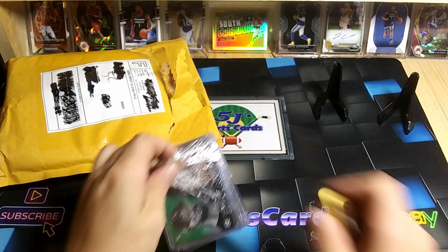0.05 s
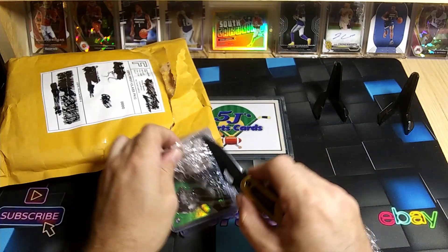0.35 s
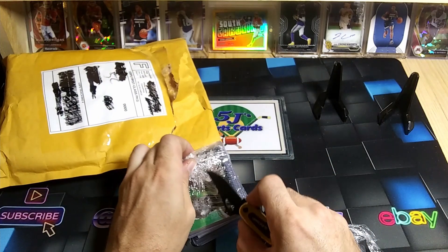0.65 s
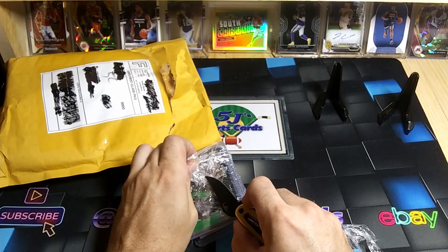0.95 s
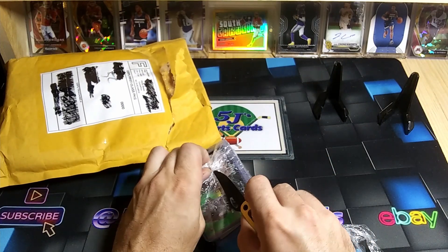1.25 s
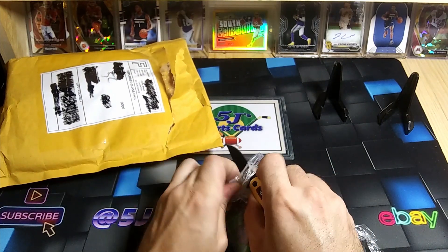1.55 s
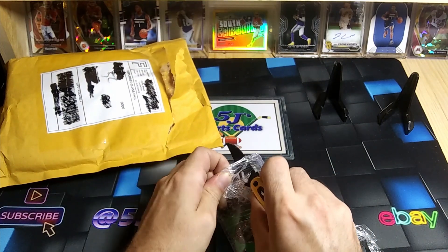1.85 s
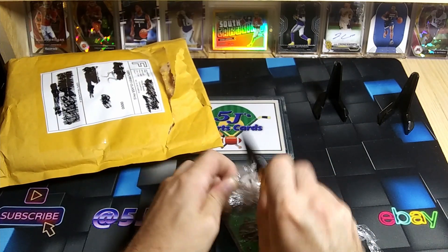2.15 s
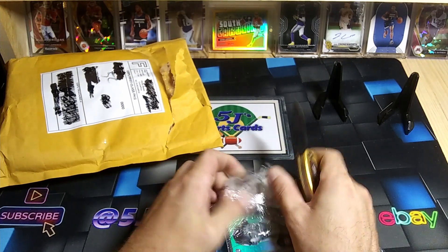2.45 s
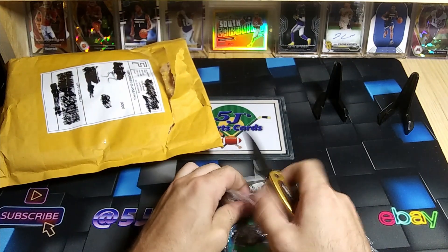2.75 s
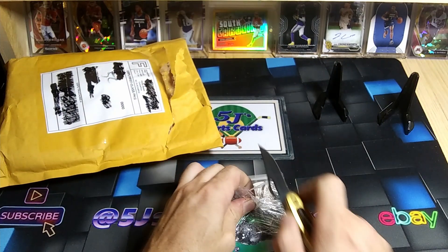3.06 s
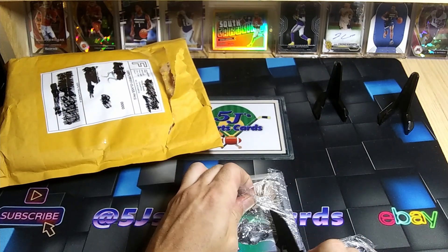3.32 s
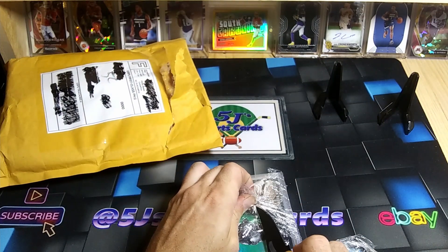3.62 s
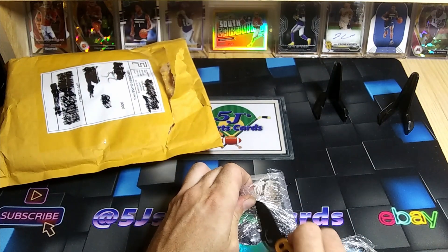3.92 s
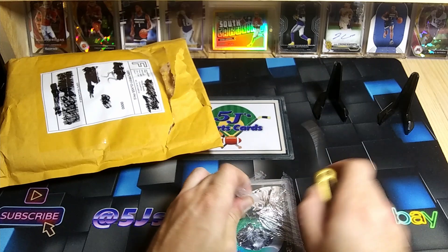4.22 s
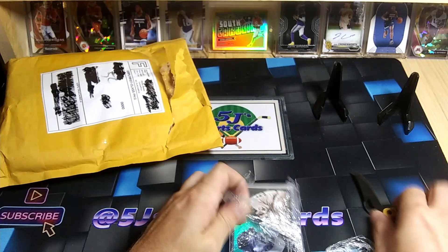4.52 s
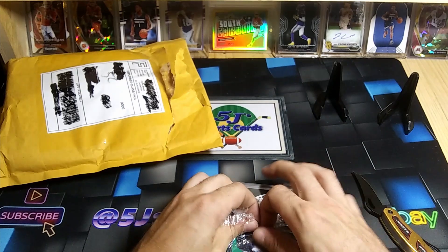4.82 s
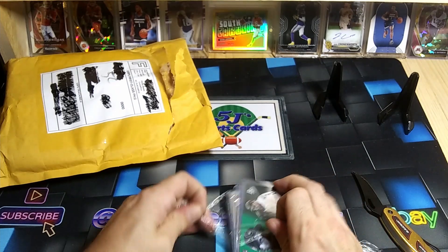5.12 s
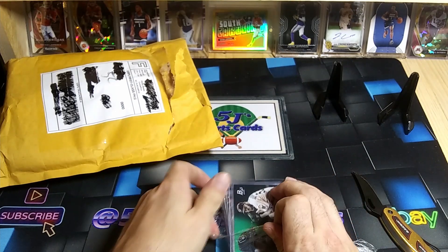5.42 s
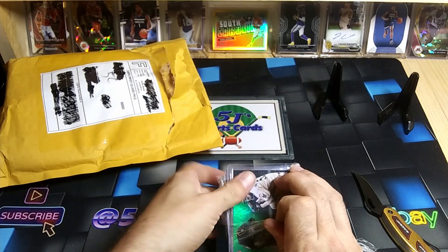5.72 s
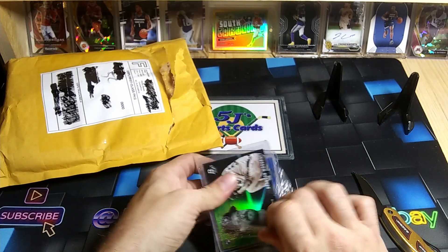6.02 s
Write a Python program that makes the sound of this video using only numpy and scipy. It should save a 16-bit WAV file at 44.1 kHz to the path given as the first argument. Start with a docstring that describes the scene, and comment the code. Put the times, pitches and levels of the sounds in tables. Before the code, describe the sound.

Close, crisp crackling of plastic wrap being cut and pulled off cards, with light knocks and finger rubbing over a soft whir.

```python
"""Clear plastic wrap is slit with a knife and peeled off a stack of cards, close to the microphone.
Each tug or cut is a burst of fine crinkle and ticks; large creases buckle in sharp snaps that ring briefly.
Fingers rub, the knife is laid down and the stack knocks, all just above a desk mat.
The place is a small room, heard in mono, with a soft steady whir farther back."""
import sys
import numpy as np
from scipy import signal
from scipy.io import wavfile
from scipy.ndimage import uniform_filter1d

SR = 44100
rng = np.random.default_rng(int(sys.argv[2]) if len(sys.argv) > 2 else 0)


def dump_mix(stems):
    """Bounce the given channels to the path in sys.argv[1] as a 16-bit WAV at rate SR."""
    frames = np.atleast_2d(stems).T  # one column per channel
    limited = np.clip(frames, -1, 1)  # hard clip at full scale
    pcm = np.round(limited * 32767).astype(np.int16)
    wavfile.write(sys.argv[1], SR, pcm)


N = 276844
TIME = np.arange(N) / SR
BAND_LIMIT_HZ = 16150

# tugs and cuts at the film: start_s, length_s, crinkle_db, rubbing_db
TUGS = [(0.0, 0.046, -58, -55), (0.838, 0.016, -56.5, -61), (0.975, 0.053, -50.5, -52),
        (1.06, 0.17, -45.5, -59), (1.42, 0.13, -33.5, -41), (1.638, 0.016, -52, -55),
        (1.734, 0.025, -47.5, -60), (1.797, 0.053, -40.5, -55), (1.946, 0.023, -46.5, -59),
        (2.018, 0.018, -37, -51), (2.107, 0.045, -35, -51), (2.168, 0.0088, -34, -35.5),
        (2.219, 0.085, -45.5, -50.5), (2.432, 0.012, -48.5, -51), (2.686, 0.028, -47, -58),
        (2.78, 0.042, -43, -48.5), (2.869, 0.06, -47, -51), (3.059, 0.026, -55, -43),
        (3.923, 0.012, -48, -60), (3.964, 0.1, -39, -48), (4.086, 0.048, -42, -42),
        (4.248, 0.015, -44.5, -44), (4.336, 0.06, -49.5, -64), (4.49, 0.075, -49.5, -59),
        (4.777, 0.054, -47, -51), (4.931, 0.034, -38.5, -54), (4.999, 0.067, -33, -53),
        (5.083, 0.15, -39.5, -44.5), (5.3, 0.035, -38, -48), (5.406, 0.01, -43, -46),
        (5.501, 0.009, -44, -48), (5.58, 0.034, -42, -46.5), (5.63, 0.024, -36.5, -35),
        (5.758, 0.033, -45, -52), (5.983, 0.11, -36.5, -48.5), (6.23, 0.01, -43.5, -44.5)]
# resonances of the wrapped stack: centre_hz, width_hz, height_db
STACK_MODES = [(895, 260, 3), (1623, 12.6, 7.5), (2700, 680, 7), (4110, 530, 7.5), (4440, 330, 6.5),
               (7800, 790, -2.5)]


def amp(db):
    """Decibels to gain."""
    return 10 ** (np.asarray(db) / 20)


def unit_rms(x):
    """Scales to rms 1."""
    return x / np.sqrt(np.mean(x ** 2) + 1e-20)


def curve_at(points, hz):
    """Reads a table on a log-frequency axis."""
    points_hz, values = np.transpose(points)
    return np.interp(np.log(hz + 1), np.log(points_hz + 1), values)


def add(mix, start_s, sound):
    """Mixes a sound in at start_s."""
    part = mix[max(round(start_s * SR), 0):][:len(sound)]
    part += sound[:len(part)]


def response(colour, peaks=(), size=4096):
    """Causal impulse response of a broad colour with resonances on top."""
    hz = abs(np.fft.fftfreq(size, 1 / SR))
    peaks_db = sum(height / (1 + (2 * (hz - centre) / width) ** 2) for centre, width, height in peaks)
    log_gain = np.log(amp(curve_at(colour, hz) + peaks_db))
    minimum_phase = np.exp(np.conj(signal.hilbert(log_gain)))
    return np.fft.ifft(minimum_phase).real[:size // 2]


def through(x, taps):
    """Convolves and keeps the length."""
    return signal.oaconvolve(x, taps)[:len(x)]


def resonate(x, hz, q):
    """One damped resonance, as a band-pass."""
    w = 2 * np.pi * min(hz, SR / 3) / SR
    a = np.sin(w) / (2 * q)
    return signal.lfilter([a, 0, -a], [1 + a, -2 * np.cos(w), 1 - a], x)


def whir(level_db=-57.5):
    """Steady air noise at the back of the room."""
    # broad spectrum of the air noise: frequency_hz, gain_db
    colour = [(30, -45), (90, -24), (170, -18), (260, -9), (350, 0.5), (560, 0.5), (800, -4.5),
              (1200, -4.5), (1500, -1), (1900, -18), (3000, -12.5), (5000, -14.5), (9000, -20),
              (16000, -26.5)]
    # its resonances: centre_hz, width_hz, height_db
    peaks = [(630, 30, 4), (1480, 90, 5), (3030, 60, 2), (3850, 300, 2)]
    return amp(level_db) * unit_rms(through(rng.standard_normal(N), response(colour, peaks)))


def room(x, gap_s=.006):
    """Sparse reflections of a small room, the bass lasting longest."""
    # decay of the room: frequency_hz, t60_s
    decay = [(200, 0.62), (1500, 0.21), (5000, 0.16), (15000, 0.32)]
    t = np.arange(SR // 2) / SR
    taps = rng.standard_normal(len(t)) * (rng.random(len(t)) < .08) * (t > gap_s)
    hz, frame_s, spectrum = signal.stft(taps, SR, nperseg=256)
    fade = amp(-60 * frame_s / curve_at(decay, hz)[:, None])
    tail = signal.istft(spectrum * fade, SR, nperseg=256)[1]
    return through(x, tail / np.linalg.norm(tail))


def desk(x):
    """The direct sound at the microphone with its first reflections."""
    # bounces off the desk and a row of card cases: delay_s, gain
    echoes = [(0.0019, 0.1), (0.00348, -0.13), (0.0055, 0.1)]
    return x + sum(gain * np.interp(TIME - delay_s, TIME, x, left=0) for delay_s, gain in echoes)


def effort(tug_db, fall_db_per_s, grip_db, rise_s=0.0096):
    """Level in dB of the hands' work: every tug rises, holds and dies away above the steady grip."""
    power = amp(grip_db) ** 2
    for (start_s, length_s, *_), db in zip(TUGS, tug_db):
        rise = np.clip((TIME - start_s) / rise_s, 0, 1)
        released_s = np.clip(TIME - start_s - length_s, 0, 1)
        power = power + (rise * amp(db - fall_db_per_s * released_s)) ** 2
    return 10 * np.log10(power)


def rubbing(trim_db=-2.0, catches_per_s=260, catch_db=17):
    """Skin and cards slide over the stack, never quite still: a dull rustle with small catches."""
    # spectrum of the friction: frequency_hz, gain_db
    colour = [(40, -26), (100, -22.5), (200, -17), (350, -6), (800, 0.5), (1300, 0.5), (2000, 0),
              (4000, -15), (16000, -28)]
    rub_db = effort([db for _, _, _, db in TUGS], fall_db_per_s=236, grip_db=-60.5)
    slide = rng.standard_normal(N)
    catches = rng.random(N) < catches_per_s / SR
    rustle = through(slide * (1 + amp(catch_db) * catches), response(colour, STACK_MODES))
    return unit_rms(rustle) * amp(rub_db + trim_db)


def drags(slips_per_s=700, q=9, trim_db=-1):
    """Something drags and rasps: a quick, uneven run of slips keeps one resonance ringing."""
    # rasping strokes: start_s, end_s, level_db, pitch_hz
    strokes = [(-.06, 0.14, -52, 1236), (3.988, 4.064, -34, 3900), (4.917, 5.055, -30.5, 4500)]
    out = np.zeros(N)
    for start_s, end_s, db, hz in strokes:
        slips = rng.standard_normal(N) * (rng.random(N) < slips_per_s / SR)
        swell = np.sin(np.pi * np.clip((TIME - start_s) / (end_s - start_s), 0, 1))
        rasp = resonate(resonate(slips, hz, q), hz, q)
        out += amp(db + trim_db) * swell * unit_rms(rasp)
    return out


def knocks(rattle_gain=0.67, rise_s=0.000087, q=1.26):
    """Soft blows: a damped tone with a rattle around it; small things radiate little bass."""
    # blunt contacts of knife, hands and stack: start_s, level_db, pitch_hz, t60_s
    contacts = [(0.9676, -29, 980, 0.039), (2.0243, -28, 1450, 0.054), (2.282, -27, 930, 0.018),
                (2.419, -41, 774, 0.037), (3.076, -39.5, 1210, 0.035), (3.707, -59, 204, 0.042),
                (4.134, -37.5, 390, 0.029), (4.521, -32, 363, 0.024), (4.523, -44, 224, 0.18),
                (4.565, -36, 1020, 0.025), (4.585, -30.5, 990, 0.017), (4.667, -55, 160, 0.11),
                (4.775, -19.5, 706, 0.015), (4.7757, -21.5, 1024, 0.016), (4.779, -47, 271, 0.2),
                (5.1039, -17, 1030, 0.016), (5.156, -32.5, 787, 0.065)]
    out, t = np.zeros(N), np.arange(SR // 4) / SR
    for start_s, db, hz, t60_s in contacts:
        rattle = unit_rms(resonate(rng.standard_normal(len(t)), hz, q=1.0))
        body = np.sin(2 * np.pi * hz * t) + rattle_gain * rattle
        envelope = amp(db - 60 * t / t60_s) * (1 - np.exp(-t / rise_s))
        add(out, start_s, resonate(body * envelope, hz, q))
    return out


def pull():
    """How hard the film is worked at each moment, in dB."""
    # the film stirs faintly between tugs, quietest at the start and at 3.2-3.8 s: time_s, crinkle_db
    grip = [(0.0, -67), (0.93, -60.5), (1.05, -54.5), (2.25, -53), (2.95, -52.5), (3.22, -63), (3.8, -60.5),
            (4.3, -52.5), (4.7, -53), (4.95, -44), (5.5, -52), (6.28, -52)]
    grip_db = np.interp(TIME, *np.transpose(grip))
    return effort([db for _, _, db, _ in TUGS], fall_db_per_s=245, grip_db=grip_db)


def snap(hz, ring_db, crack_taps, ring_taps, q=2.9, size=2048,
         jerk_s=0.00037, rise_s=0.00051, fast_t60_s=0.025, slow_t60_s=0.098):
    """A facet of film flips in a short crack; waves then scatter through film and stack."""
    t = np.arange(size) / SR
    # the fold runs along the crease in a few uneven jerks, so no two cracks have the same colour
    jerks = (t == 0) + 0.37 * rng.standard_normal(size) * np.exp(-t / jerk_s)
    push = through(jerks, crack_taps)
    # a higher bending mode of the facet gives the crack its edge
    crack = resonate(push, hz, q) + 0.24 * resonate(push, hz * 1.66, q)
    crack = crack / abs(signal.hilbert(crack)).max()
    rise = 1 - np.exp(-(t / rise_s) ** 2)
    fade = amp(-60 * t / fast_t60_s) + amp(-16 - 60 * t / slow_t60_s)
    scatter = resonate(through(rng.standard_normal(size) * rise * fade, ring_taps), hz, q=0.89)
    # the taut film around each crease sings on briefly in a few modes of its own
    modes_hz = [hz * 2 ** (0.55 * (step + rng.uniform(-0.478, 0.452))) for step in (-2, -1, 0.21, 0.86)]
    ring = scatter + 2.42 * sum(resonate(scatter, mode_hz, q=30) for mode_hz in modes_hz)
    ring *= np.linalg.norm(crack) / np.linalg.norm(ring)
    return rng.choice([-1, 1]) * crack + amp(ring_db) * ring


def crinkle(crack_taps, ring_taps, base_per_s=1000, spread_db=5, cap_db=17,
            pitch_hz=3800, trim_db=0.5, facets=40):
    """Swarms of tiny creases of many sizes, thicker as the film is pulled harder."""
    pull_db = pull()
    per_s = base_per_s * amp(.7 * (pull_db + 43))
    sizes = amp(np.minimum(spread_db * rng.exponential(1, N), cap_db))
    clicks = sizes * (rng.random(N) < per_s / SR)
    # the pull sets how much energy the creases share out from moment to moment
    power = uniform_filter1d(uniform_filter1d(clicks ** 2, size=900), size=900)
    clicks = clicks / np.sqrt(abs(power) + per_s / SR) * amp(pull_db + trim_db)
    # half of the clicks come from one facet, worked over and over for a moment
    busy_facet = rng.integers(0, facets, N)[np.arange(N) // (SR // 20)]
    click_facet = np.where(rng.random(N) < .5, busy_facet, rng.integers(0, facets, N))
    out = np.zeros(N)
    for facet, place in enumerate(np.linspace(-1, 1, facets)):
        hz = pitch_hz * 2 ** (0.38 * (place + place ** 3))
        grain = snap(hz, 0, crack_taps, ring_taps, q=3.0)
        out += through(clicks * (click_facet == facet), grain / np.linalg.norm(grain))
    return out


def ticks(crack_taps, ring_taps, per_s=32, above_db=13, spread_db=4.0, cap_db=-20,
          pitch_hz=4000, spread_octaves=0.4, ring_db=-6, top_hz=9000, count=400):
    """Middling creases let go at random: dry ticks, each at its own pitch, above the crinkle."""
    pull_db = pull()
    out = np.zeros(N)
    starts_s = np.cumsum(rng.exponential(1 / per_s, count))
    for start_s, (strength, detune) in zip(starts_s[starts_s < TIME[-1]], rng.standard_normal((count, 2))):
        db = min(pull_db[int(start_s * SR)] + above_db + spread_db * strength, cap_db)
        hz = pitch_hz * 2 ** (spread_octaves * detune)
        add(out, start_s, amp(db) * snap(hz, ring_db, crack_taps, ring_taps))
    return signal.lfilter(*signal.butter(2, top_hz, fs=SR), out)


def creases(crack_taps, ring_taps, dullest_hz=7000):
    """Large creases snap; the larger the facet, the slower it flips and the less treble it has."""
    # one large crease buckling per row: start_s, level_db, pitch_hz
    buckles = [(0.5214, -37.5, 3430), (0.574, -44, 3500), (0.967, -12, 3310), (1.0165, -31.5, 3840),
               (1.1201, -23.5, 3900), (1.176, -16.5, 7000), (1.198, -20, 3680), (1.291, -30, 5600),
               (1.4325, -41, 3340), (1.442, -10.5, 2660), (1.4668, -14, 4400), (1.502, -20, 3600),
               (1.54, -24, 3140), (1.554, -13, 2330), (1.7826, -18, 3600), (1.8248, -22, 2950),
               (1.8396, -9.5, 2690), (1.9, -29, 2820), (2.0082, -13.5, 3230), (2.0272, -10, 2890),
               (2.052, -11.5, 2570), (2.0984, -20, 4260), (2.1133, -11, 4400), (2.156, -31, 3640),
               (2.1783, -8.5, 2080), (2.684, -30, 3670), (2.7921, -18, 3930), (2.821, -21, 3850),
               (3.312, -41, 3300), (3.8364, -29.5, 4500), (3.9682, -6.5, 3000), (3.98, -23, 3600),
               (3.989, -7.5, 4180), (3.992, -9.5, 3840), (4.0058, -14.5, 4200), (4.0156, -14, 4120),
               (4.018, -14.5, 3630), (4.0237, -21, 3900), (4.0382, -10.5, 3550), (4.0499, -9, 3770),
               (4.1326, -5, 2630), (4.1374, -7.5, 2700), (4.32, -19, 4190), (4.3648, -24, 4320),
               (4.3993, -27, 3330), (4.5856, -25, 2540), (4.7749, -22, 3260), (4.923, -25.5, 4200),
               (4.9797, -12.5, 4300), (4.9877, -10, 3630), (4.9937, -9, 4200), (5.0149, -6, 4270),
               (5.0595, -17.5, 3750), (5.103, -1, 2700), (5.141, -21, 3840), (5.161, -15, 3260),
               (5.226, -15, 3660), (5.5987, -21, 3400), (5.6372, -8, 3400), (5.9782, -23, 5000),
               (6.024, -14.5, 3500), (6.2387, -18, 4100), (6.2445, -19, 3600)]
    out = np.zeros(N)
    for start_s, db, hz in buckles:
        ring_db = -6 - 0.28 * db  # the harder the snap, the more of it is in the first crack
        top_hz = min(dullest_hz * amp(-0.31 * db), BAND_LIMIT_HZ)
        sound = signal.lfilter(*signal.butter(2, top_hz, fs=SR), snap(hz, ring_db, crack_taps, ring_taps))
        add(out, start_s - .0002, amp(db) * sound)
    return out


def loosened(film, free_s=5.96, above_hz=7500, sizzle_gain=0.39):
    """Once the film hangs free of the stack, its finest creases sizzle more brightly."""
    treble = signal.filtfilt(*signal.butter(2, above_hz, "high", fs=SR), film)
    return film + sizzle_gain * treble * (TIME > free_s)


def scene(room_db=-15, film_above_hz=290, handling_above_hz=125):
    """Wrap and hands close to the microphone, the room around them."""
    # spectrum of a crease's first crack: frequency_hz, gain_db
    crack_colour = [(100, -31), (400, 0), (1000, 0), (2000, -1.5), (2800, 1.5), (4300, 1), (6000, -6),
                    (8500, -11.5), (11000, -6), (16000, -1)]
    # spectrum of the waves scattering after it: frequency_hz, gain_db
    ring_colour = [(100, -38), (250, 9.5), (600, -0.5), (1200, 6), (2000, -7.5), (3000, -7.5), (4400, -9.5),
                   (6000, -4.5), (9000, -1.5), (12000, -8.5), (16000, -25.5)]
    taps = response(crack_colour), response(ring_colour, STACK_MODES)
    film = loosened(creases(*taps) + ticks(*taps) + crinkle(*taps))
    # so light a sheet radiates almost no bass
    film = signal.lfilter(*signal.butter(2, film_above_hz, "high", fs=SR), film)
    handling = rubbing() + drags() + knocks()
    handling = signal.lfilter(*signal.butter(2, handling_above_hz, "high", fs=SR), handling)
    near = desk(film + handling)
    return (near + amp(room_db) * room(near) + whir())[None]


def record(dry):
    """The recorder's band limit."""
    taps = signal.firwin(511, BAND_LIMIT_HZ, window=("kaiser", 9), fs=SR)
    return signal.oaconvolve(dry, taps[None], "same")


dry = scene()
out = record(dry)
dump_mix(out)
```